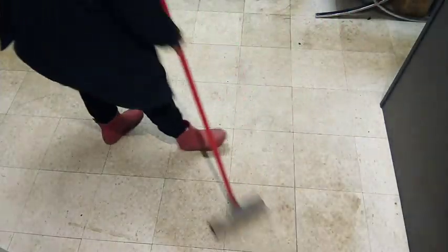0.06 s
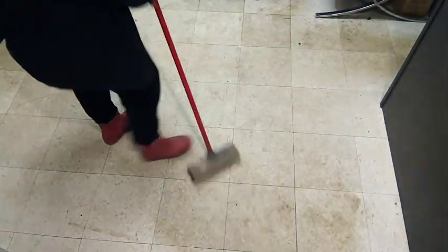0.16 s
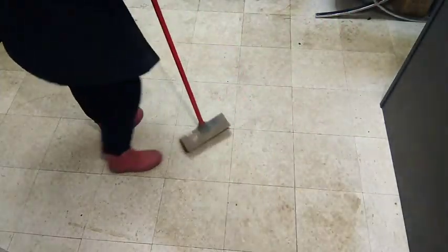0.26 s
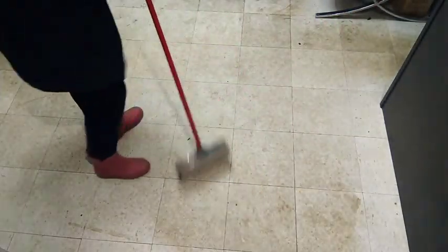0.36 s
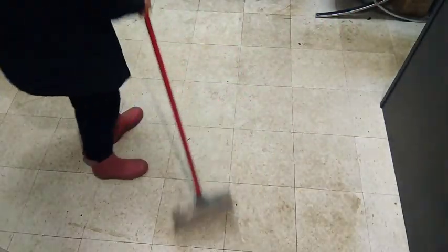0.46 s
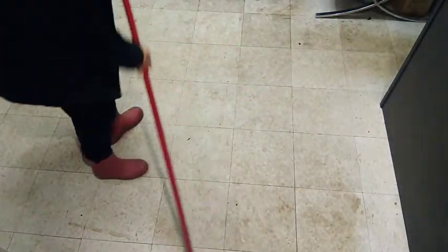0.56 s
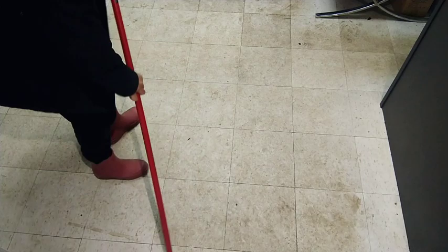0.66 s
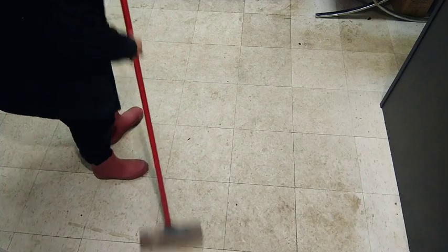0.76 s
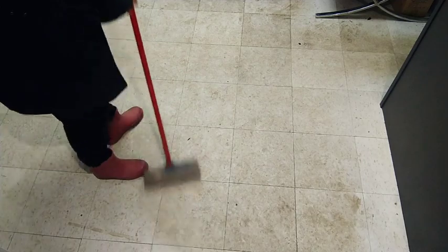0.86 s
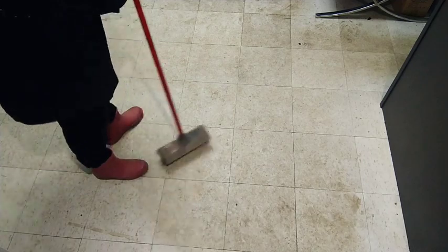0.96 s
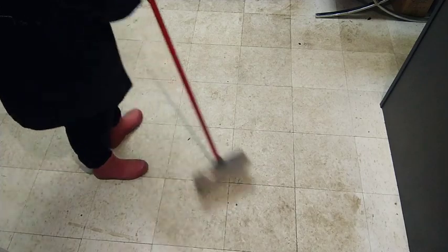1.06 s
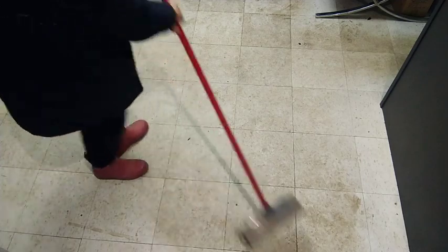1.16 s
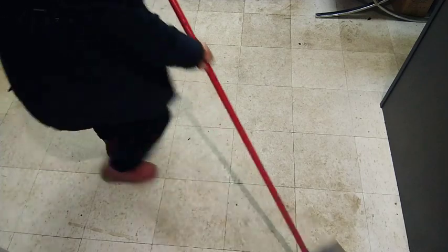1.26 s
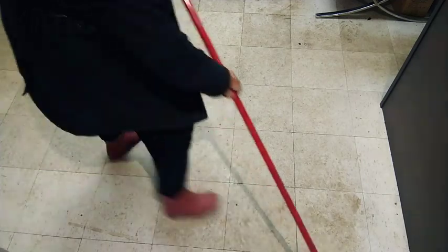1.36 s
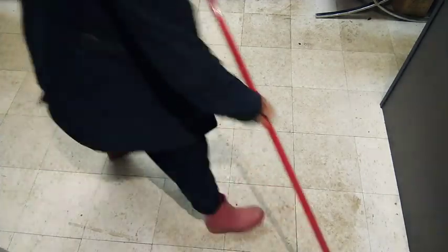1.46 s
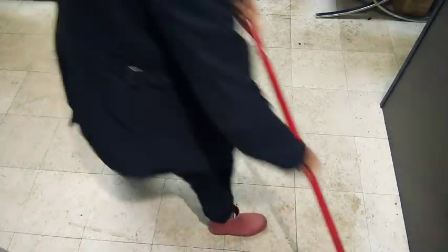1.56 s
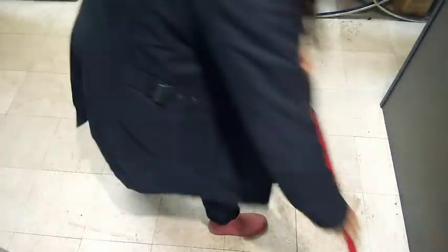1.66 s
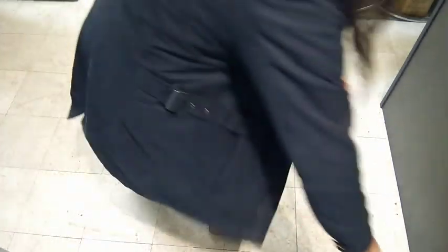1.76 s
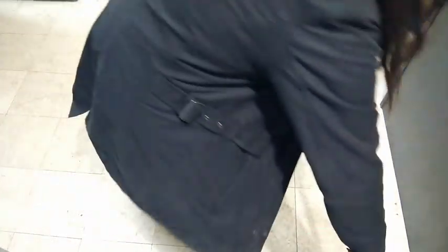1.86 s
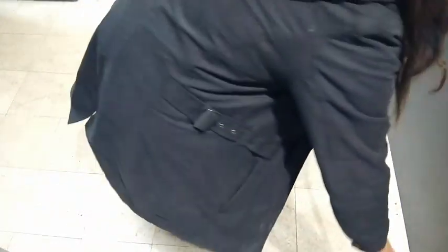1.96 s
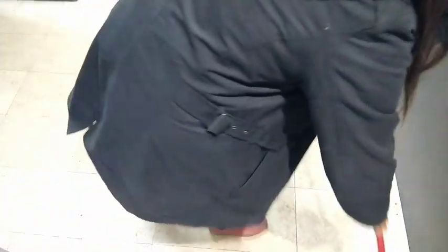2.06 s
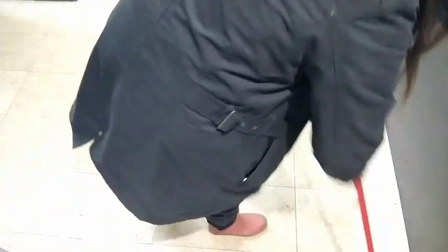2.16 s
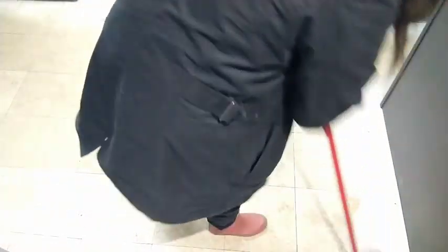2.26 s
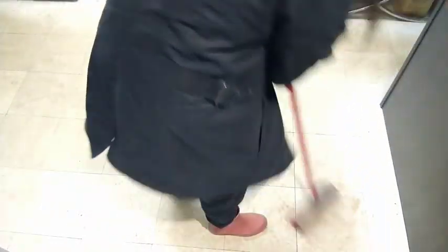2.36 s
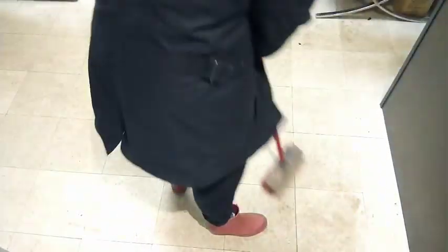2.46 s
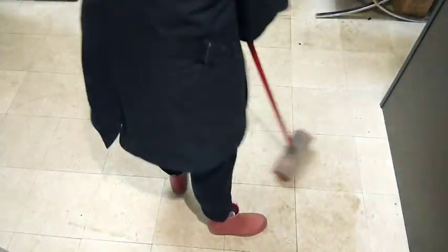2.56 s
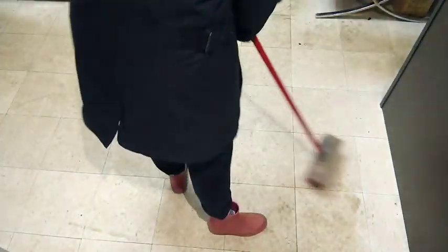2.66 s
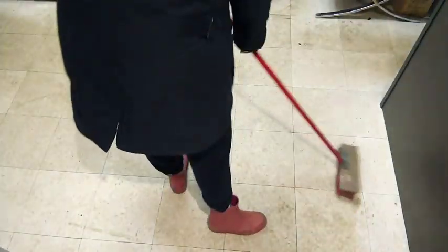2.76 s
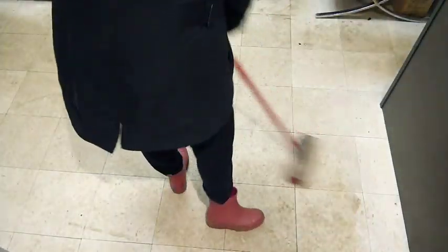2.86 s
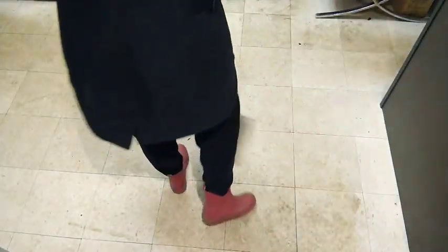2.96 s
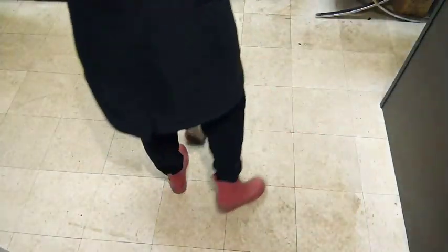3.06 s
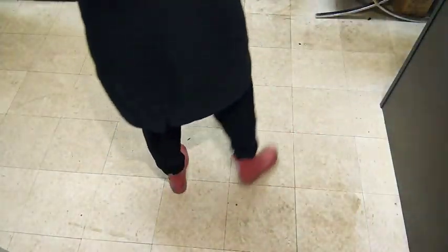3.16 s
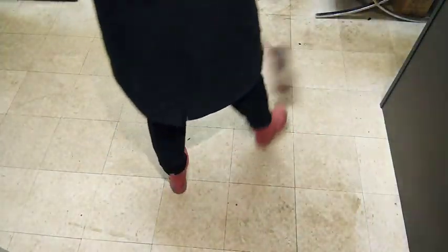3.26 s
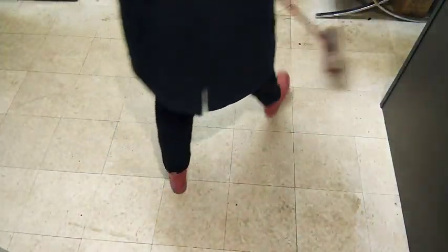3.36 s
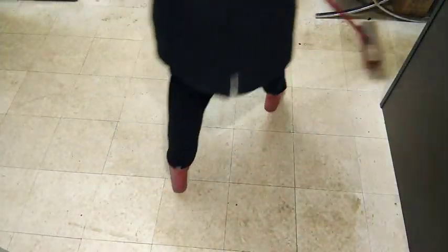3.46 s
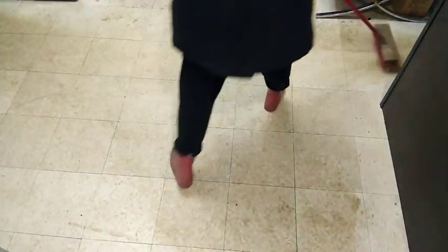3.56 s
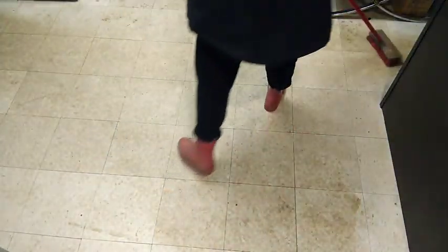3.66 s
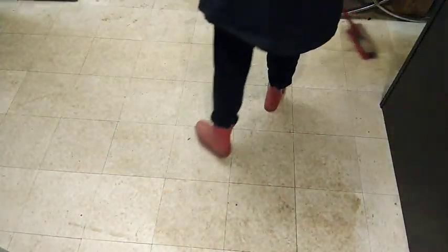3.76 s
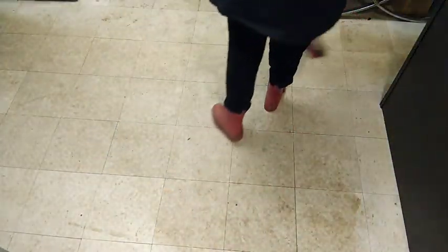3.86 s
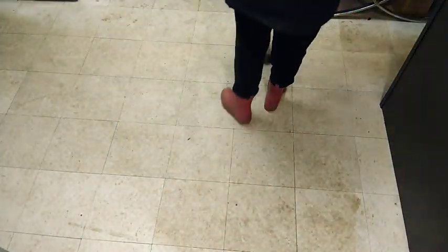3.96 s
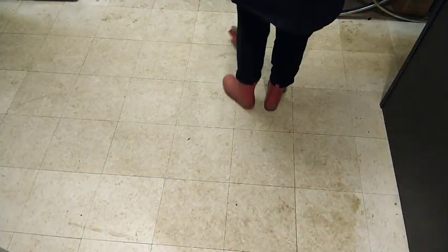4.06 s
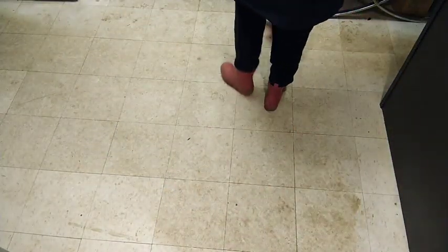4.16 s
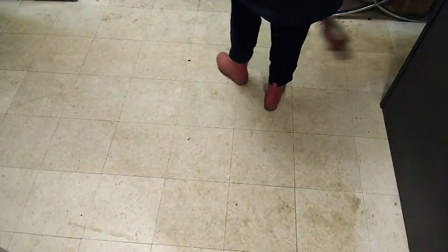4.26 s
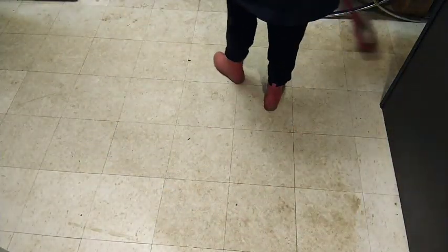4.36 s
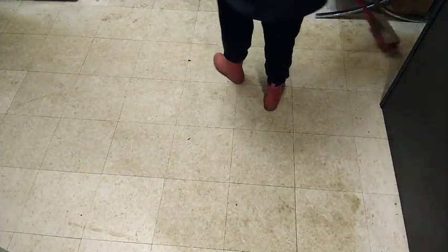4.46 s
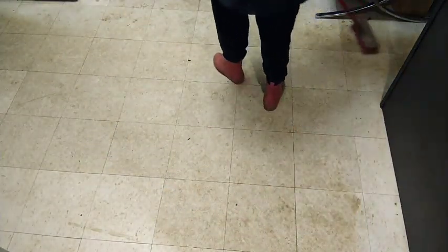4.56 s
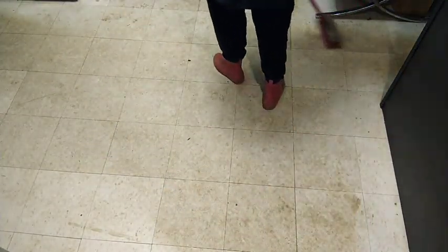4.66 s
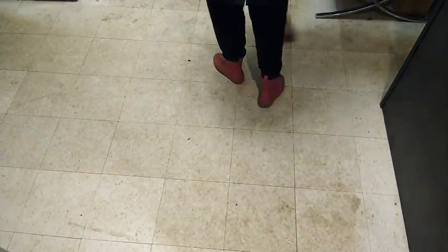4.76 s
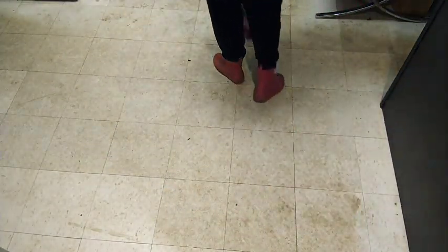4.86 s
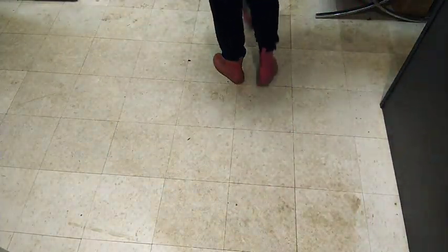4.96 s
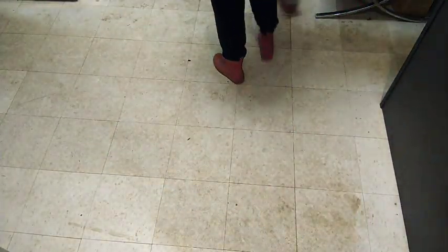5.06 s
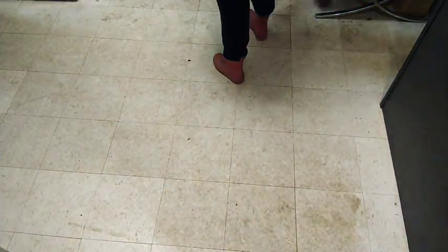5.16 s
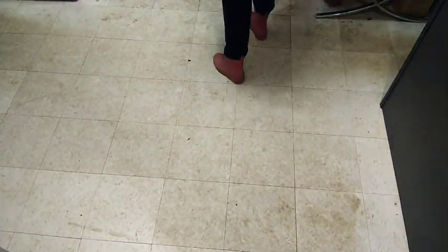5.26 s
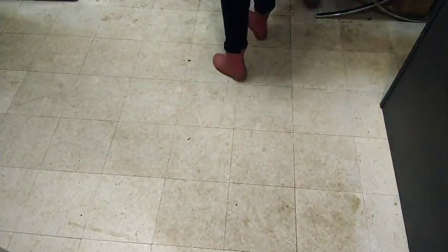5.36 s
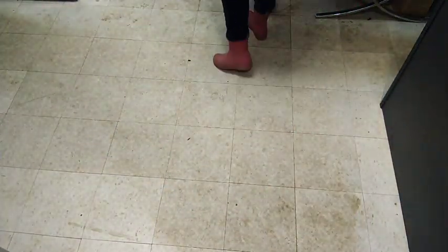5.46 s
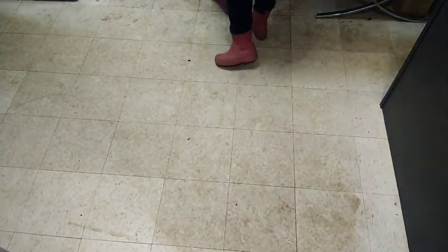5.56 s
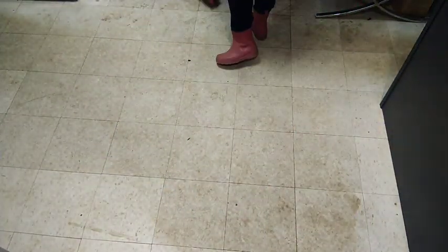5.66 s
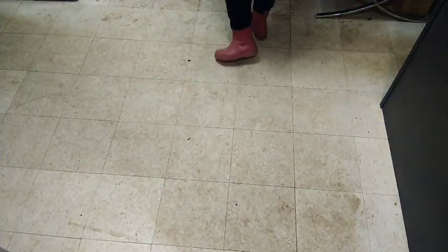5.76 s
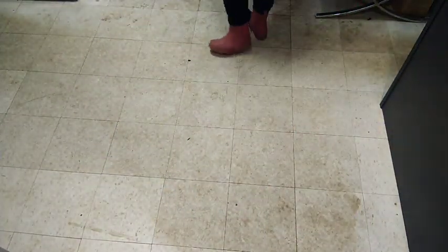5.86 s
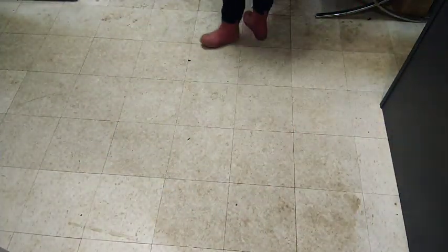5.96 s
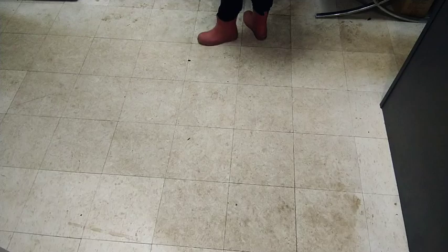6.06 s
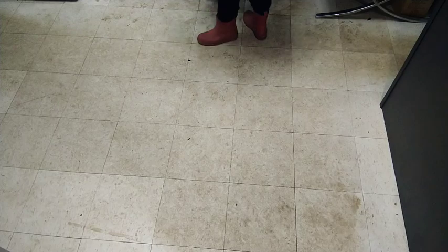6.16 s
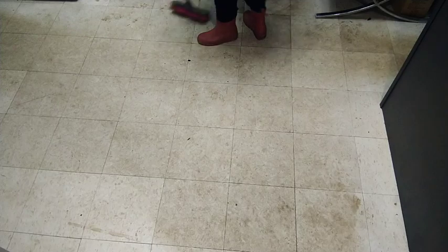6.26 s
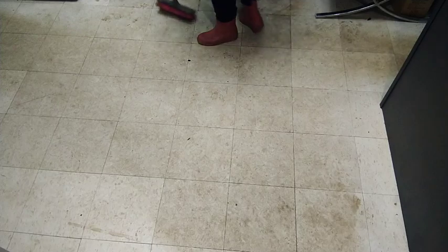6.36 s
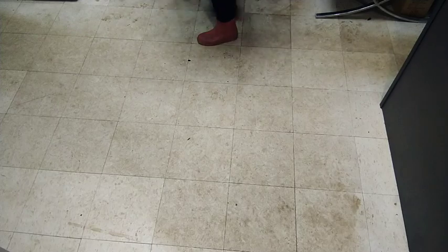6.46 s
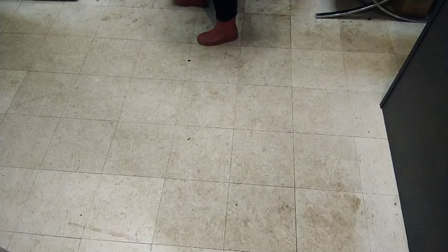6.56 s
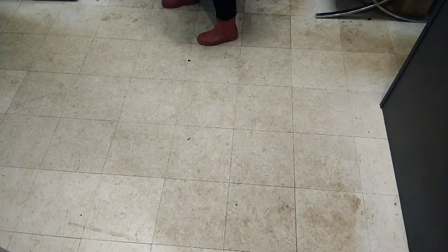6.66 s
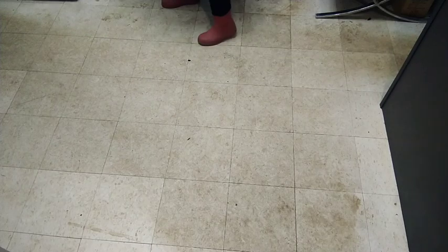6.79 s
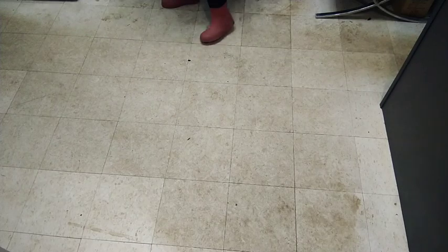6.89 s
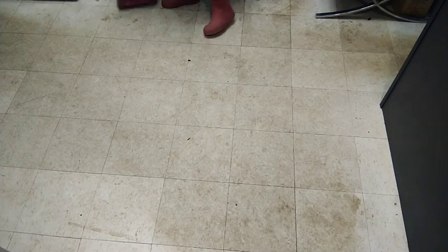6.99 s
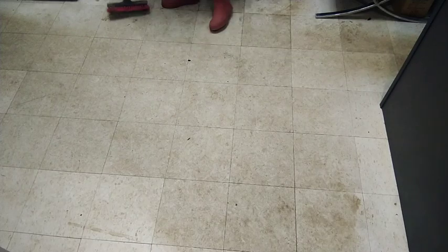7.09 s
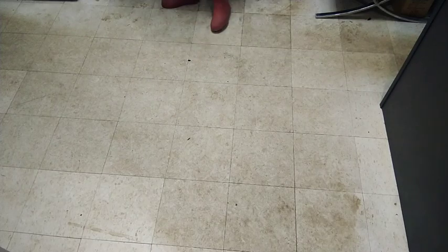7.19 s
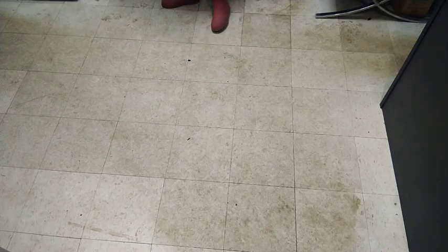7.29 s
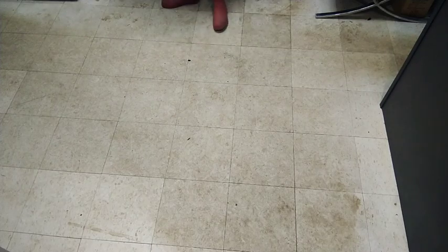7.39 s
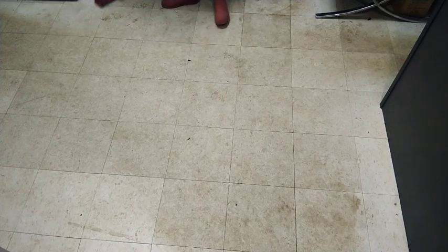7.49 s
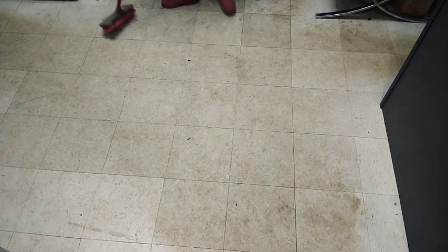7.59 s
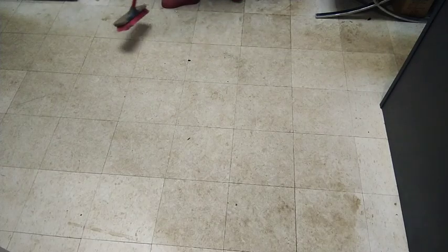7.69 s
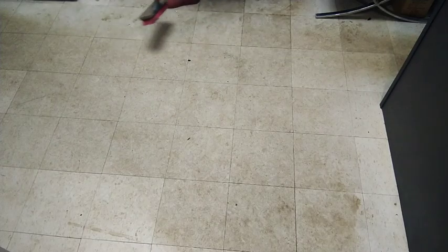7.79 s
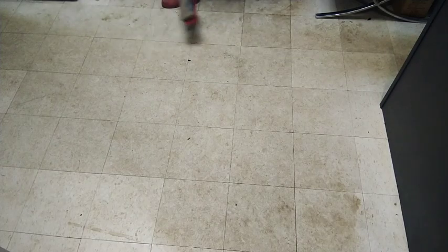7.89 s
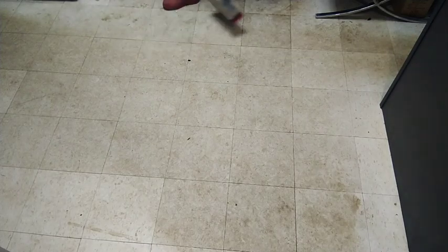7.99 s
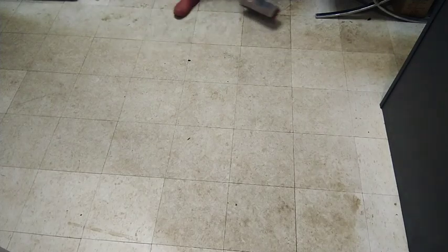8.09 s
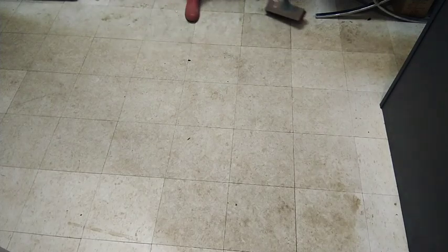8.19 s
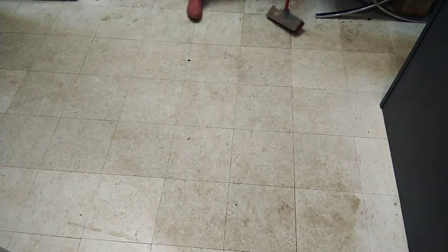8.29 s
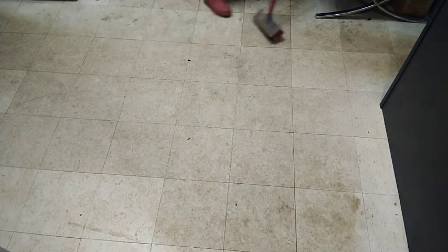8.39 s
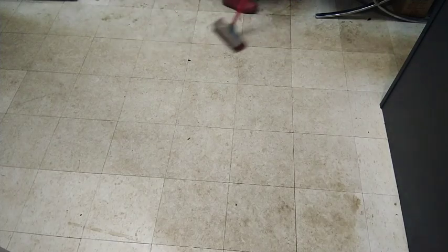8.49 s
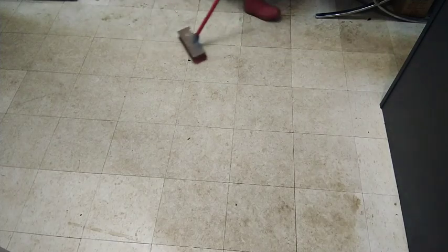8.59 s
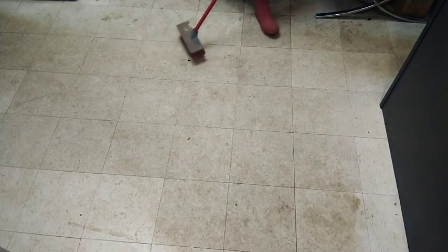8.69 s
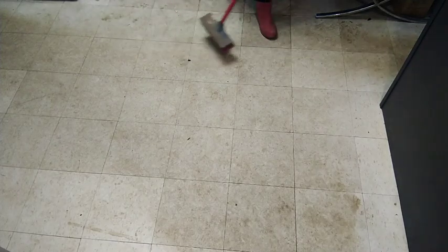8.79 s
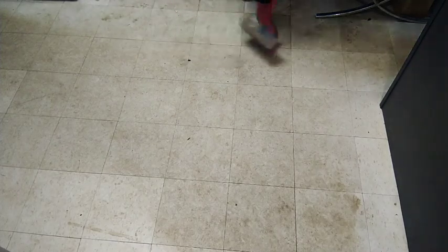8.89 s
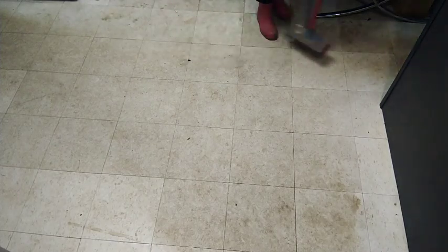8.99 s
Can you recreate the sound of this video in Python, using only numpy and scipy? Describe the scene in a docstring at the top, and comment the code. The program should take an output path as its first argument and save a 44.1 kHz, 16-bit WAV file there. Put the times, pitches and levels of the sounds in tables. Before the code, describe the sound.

A small hard room carries faint ventilation noise, a weak hum and occasional low rumble. At 0 s a stiff broom is already sweeping tiles: a strong, bright, hissing rasp, then a head click at 0.2 and bristle flicks near 0.5. Another stroke comes at 0.7; a step and scuff at 1.2, coat rustle, and a step at 1.6. Sharp head clacks at 1.95 lead to by far the loudest event at 2.1: a close cupboard door thumps shut, bouncing four times within a tenth of a second, its panel ringing low and rattling briefly, over a forceful stroke. Strokes follow at 2.9, 3.7, 4.6, a short dab at 5.2, then 5.4, 6.1, 6.9 and 7.5, with clicks, fine bristle ticks, soft footfalls at 4.4, 5.2 and 6.7, and small rubber squeaks. Light sole taps and scuffs surround a last very weak stroke at 8.4.

```python
"""From the first moment a stiff broom sweeps a tiled floor, in a small room with a humming appliance.
Through a dozen strokes bristles slip as dense grains of noise, then flick free; the head clicks on its handle.
Rubber soles scuff, step and tap now and then throughout, as bursts of coloured noise; a coat rustles.
About two seconds in, a cupboard door is pushed shut close by: it bounces, and decaying panel modes ring.
A phone hears it all to the last, weak stroke, its right port ringing in the treble."""
import sys
import numpy as np
from scipy import signal
from scipy.fft import rfft, irfft, next_fast_len
from scipy.io import wavfile

SR = 44100
rng = np.random.default_rng(int(sys.argv[2]) if len(sys.argv) > 2 else 0)


def dump_mix(stems):
    """Bounce the given channels to the path in sys.argv[1] as a 16-bit WAV at rate SR."""
    frames = np.atleast_2d(stems).T  # one column per channel
    limited = np.clip(frames, -1, 1)  # hard clip at full scale
    pcm = np.round(limited * 32767).astype(np.int16)
    wavfile.write(sys.argv[1], SR, pcm)


N = 398223
T = np.arange(N) / SR  # t/s

# Ventilation noise, spectral shape: f/Hz, level/dB per Hz
AIR_SPECTRUM = [(20, -3.5), (45, -16), (80, -5.5), (130, -2.5), (220, -6.5), (320, -18), (450, -10.5),
                (650, -19.5), (1300, -19.5), (3000, -27), (7000, -31.5), (16000, -49)]
# Appliance hum, partials: f/Hz, level/dB
HUM_PARTIALS = [(81, -74), (209, -76.5), (427, -68.5)]
# Spells of low rumble: start t/s, end t/s, f/Hz, level/dB
RUMBLE_SPELLS = [(2.4, 3.154, 96, -62), (2.997, 6.8, 130, -65.5), (7.05, 9.1, 81.8, -66.5)]
# Spells of movement that rustle the coat: start t/s, end t/s, level/dB
COAT_MOVES = [(0, 1.3, -67.5), (1.455, 2.805, -66.5), (3.547, 7.7, -69), (4.25, 4.51, -75.5),
              (8.106, 8.862, -66.5)]
# Coat cloth, spectral shape: f/Hz, level/dB per Hz
CLOTH_SPECTRUM = [(300, 1), (4000, -0.5), (7000, -5.5), (16000, -15.5)]
# Door striking its frame and bouncing: t/s, level/dB
DOOR_BLOWS = [(2.098, -8), (2.121, -12), (2.1463, -14.5), (2.172, -19.5)]
# Modes of the door panel: f/Hz, relative level/dB, T60/s
DOOR_MODES = [(51, -19, 0.45), (81.3, -13, 0.48), (118.1, -1, 0.386), (135.7, 4, 0.27), (173.8, 0.5, 0.42),
              (215.4, 3, 0.38), (241, 1, 0.27), (266.7, -1, 0.35), (309.6, -2, 0.33), (375, -4, 0.32),
              (396, -2, 0.24), (423, -7.5, 0.51), (462, -6, 0.33), (489.6, -5.5, 0.47), (550, -13, 0.51),
              (593, -17, 0.29), (622, -13, 0.21), (734, -11.5, 0.43), (802, -12, 0.4), (885, -15, 0.25),
              (1330, -19.5, 0.39)]
# Rattle of the door, spectral shape: f/Hz, level/dB per Hz
RATTLE_SPECTRUM = [(60, -17), (220, -7.5), (450, 1), (850, -7), (1200, -24.5), (2300, -17), (3200, -26.5),
                   (16000, -81)]
# Footfalls: t/s, level/dB
FOOTFALLS = [(1.208, -51.5), (1.634, -50.5), (4.429, -56.5), (5.213, -53.5), (5.377, -54), (6.704, -48)]
# Hollow taps of the soles: t/s, level/dB
SOLE_TAPS = [(1.635, -61), (5.282, -57), (7.825, -62), (8.535, -62)]
# Soles dragging: t/s, length/s, level/dB, tail relative level/dB,
# squeak f/Hz, squeak relative level/dB, squeak width/share of its f
SOLE_SCUFFS = [(0.164, 0.062, -54, -13, 712, -8, 0.48), (1.209, 0.066, -53, -4, 653, -22, 0.25),
               (5.194, 0.13, -71, -19, 3050, 9.5, 0.082), (6.685, 0.074, -59.5, -8, 2630, -8, 0.14),
               (8.253, 0.04, -65, -13, 2590, -2, 0.22), (8.717, 0.045, -60, -17, 2210, -13, .12)]
# Thud of a footfall, spectral shape: f/Hz, level/dB per Hz
FOOT_SPECTRUM = [(40, -24), (110, 7), (200, 0), (450, -6), (1500, -18), (5000, -51)]
# Dragging sole, spectral shape: f/Hz, level/dB per Hz
SOLE_SPECTRUM = [(300, -6), (800, 1.5), (1400, -7.5), (2400, 1), (4500, 1.5), (7500, -2.5), (16000, -17)]
# Head clicking on handle and floor: t/s, crack level/dB, hollow ring level/dB, ping f/Hz, ping level/dB
HEAD_CLACKS = [(0.218, -46, -45.5, 2010, -54), (0.711, -58, -50.5, 1360, -55),
               (1.208, -45.5, -75, 2150, -61), (1.954, -46.5, -52, 1380, -53), (1.961, -39, -44, 6160, -57),
               (2.870, -40, -68, 2480, -51), (3.748, -53, -52, 2290, -54), (4.621, -44, -54, 5200, -54),
               (5.362, -63, -68, 5430, -51), (5.377, -61, -56, 3570, -51), (6.075, -49, -59, 5340, -64)]
# Sharp crack, spectral shape: f/Hz, level/dB per Hz
CRACK_SPECTRUM = [(200, 7), (1000, -7), (2500, 0.5), (5200, 4), (8000, -4), (16000, -24)]
# Bristles flicking free between strokes: t/s, level/dB, rise/s, twang f/Hz
BRISTLE_FLICKS = [(0.402, -57.5, 0.0024, 7000), (0.472, -55, 0.013, 7650), (0.58, -55, 0.0083, 6600),
                  (1.421, -54, 0.0026, 7060), (1.726, -61, 0.0022, 6500), (3.286, -59, .0005, 14100),
                  (4.348, -57.5, 0.006, 6630), (5.192, -51.5, 0.0037, 6400), (5.868, -53, .005, 9540),
                  (6.534, -57.5, 0.00067, 9000), (7.348, -54, 0.0011, 13800)]
# Tick of freed bristles, spectral shape: f/Hz, level/dB per Hz
FLICK_SPECTRUM = [(1500, -15), (4500, -6), (8000, -3.5), (9300, 2), (11500, -3.5), (14000, -4),
                  (16000, -25)]
# Broom strokes: t/s, length/s, force/dB, brightness/dB, share of length spent speeding up,
# landing grit level/dB, head ring f/Hz, head ring level/dB, head ring T60/s
BROOM_STROKES = [ (0.0, 0.34, 4.5, 1.9, 0.69, -56.5, 1364, -47, 0.16),
                 (0.727, 0.3, 1.6, 0.7, 0.81, -57, 1137, -56, 1.9),
                 (2.109, 0.47, 5.5, 1.5, 0.74, -44, 1373, -54, 1),
                 (2.873, 0.26, 2.5, 0.7, 0.53, -51.5, 1210, -74, 1.2),
                 (3.747, 0.38, -2.5, 0, 0.75, -61, 1116, -59, 0.89),
                 (4.624, 0.33, 0, 0, 0.69, -57, 1210, -63, 0.81),
                 (5.197, 0.094, 0.5, -7, 0.6, -62, 1150, -82, 1),
                 (5.362, 0.33, 0, -2.5, 0.56, -55, 1130, -65, 1.2),
                 (6.078, 0.32, -1, -0.9, 0.68, -57.5, 1170, -77, 1.3),
                 (6.856, 0.28, -2.5, 0.1, 0.64, -56, 1150, -65, 0.98),
                 (7.455, 0.2, -6.5, 1, 0.62, -57.5, 998, -72, 0.72),
                 (8.405, 0.31, -14.5, 2, 0.66, -66.5, 1430, -88, 1)]
# Hiss of the sliding tips, spectral shape: f/Hz, level/dB per Hz
HISS_SPECTRUM = [(1500, -29), (5200, -10.5), (6400, 2), (7500, 3), (9000, -2.5), (11000, -8), (15500, -25)]
# Finer fizz of the tips, spectral shape: f/Hz, level/dB per Hz
FIZZ_SPECTRUM = [(5000, -16), (8500, 0), (10500, 3.5), (12500, 3), (14500, 0.5), (16000, -5)]
# Scrape of the bristle shafts, spectral shape: f/Hz, level/dB per Hz
SCRAPE_SPECTRUM = [(400, -13.5), (850, -15), (1100, -4), (1850, -3), (2200, 2), (2650, 4), (4200, 3),
                   (6000, 0.5), (12000, -23)]
# Grit under the landing head, spectral shape: f/Hz, level/dB per Hz
HEAD_SPECTRUM = [(400, -13), (800, -5), (1100, 6), (1550, 4.5), (2300, -1.5), (3500, -4), (5500, -12),
                 (8000, -8.5), (14000, -16)]
# Extra gain of the right port: f/Hz, level/dB
RIGHT_PORT_GAIN = [(150, 1.5), (2500, -0.5), (4400, 2), (5500, 4.5), (6300, 8.5), (7100, 8.5), (8200, 4.5),
                   (10500, 0.5)]

RUMBLE_EASE_S, MOVE_EASE_S = 0.052, 0.12
COAT_WAVER_DB = 2.5
TAP_HZ, TAP_T60_S = 570, 0.21
SQUEAK_BEND, SQUEAK_SETTLE_S, SOLE_CHATTER_DB = 0.162, 0.0219, 2  # bend is a share of the pitch
HOLLOW_HZ, HOLLOW_T60_S = 1200, 0.068  # the ring of the hollow head
PING_T60_S = 0.082
FLICK_T60_S, TWANG_DB, TWANG_T60_S = 0.19, -9, 0.16
HISS_DB, FIZZ_DB, SCRAPE_DB = -44.5, -46, -53.5  # a stroke of ordinary force
# dB per dB: a bright stroke rides on the tips and scrapes less
SCRAPE_PER_FORCE, SCRAPE_PER_BRIGHTNESS = 0.51, -1.25
BEND_S = .13  # strokes much shorter than this barely load the head
HANDLE_HZ, HANDLE_DB = 2150, -13  # level relative to the scrape
# loose outer bristles skim the tiles at any force, most in a short dab
SKIM_HZ, SKIM_DB, DAB_DB = 4430, -63.5, 5
TOP_HZ = 15700


def undb(db):
    """Level in decibels becomes an amplitude ratio."""
    return 10 ** (np.asarray(db) / 20)


def unit(x):
    """Normalization to an rms of 1."""
    return x / np.sqrt(np.mean(x ** 2))


def add(out, x, s):
    """Superposition: x is summed into out from time s."""
    i = max(int(s * SR), 0)
    out[..., i:i + x.shape[-1]] += x[..., :N - i]


def colour(x, spectrum):
    """Linear filtering: the gain is interpolated between (f/Hz, level/dB) points on a log frequency axis."""
    hz, db = np.transpose(spectrum)
    size = next_fast_len(x.shape[-1])
    f = np.maximum(np.fft.rfftfreq(size, 1 / SR), 1)
    gain = undb(np.interp(np.log(f), np.log(hz), db))
    return irfft(rfft(x, size) * gain, size)[..., :x.shape[-1]]


def resonance(hz, width=.12):
    """Resonance: a spectrum of one peak, 13 dB down at a share `width` of its frequency to either side."""
    return [(hz / 3, -45), (hz / (1 + width), -13), (hz, 0), (hz * (1 + width), -13), (hz * 3, -45)]


def diffuse(size, apart_hz=480):
    """Diffuse field: noise from all sides, on which the two ports agree only in the bass."""
    mid, side = rfft(rng.standard_normal((2, size)))
    alike = np.exp(-(np.fft.rfftfreq(size, 1 / SR) / apart_hz) ** 3)
    common = mid * np.sqrt(1 + alike)
    opposed = np.array([[1], [-1]]) * side * np.sqrt(1 - alike)
    return unit(irfft(common + opposed, size))


def burst(spectrum, envelope):
    """Amplitude modulation: coloured diffuse noise under an envelope."""
    return unit(colour(diffuse(len(envelope)), spectrum)) * envelope


def fade(t60):
    """Damping: one second of exponential decay, falling 60 dB in t60."""
    return undb(-60 * T[:SR] / t60)


def swell(rise_s):
    """Exponential build-up: one second of a rounded onset."""
    return 1 - np.exp(-T[:SR] / rise_s)


def spell(start, end, ease_s):
    """Smooth gating: an envelope that eases in, holds and eases out."""
    return (np.tanh((T - start) / ease_s) - np.tanh((T - end) / ease_s)) / 2


def wander(count):
    """Slow chance: random values spread over the whole scene and joined by lines."""
    return np.interp(T, np.linspace(0, T[-1], num=count), rng.standard_normal(count))


def judder(depth_db):
    """Irregular friction or contact: one second of gain that varies unevenly, mostly below 100 Hz."""
    slow_noise = colour(rng.standard_normal(SR), [(5, 12.5), (25, 8.0), (120, -40), (800, -68)])
    return undb(depth_db * unit(slow_noise))


def grains(per_s, spread_db, size, direct=0.25):
    """Stick-slip: countless bristle slips; scattering makes each one differ at the two ports."""
    happens = rng.random(size) < per_s / SR
    slips = happens * undb(spread_db * np.minimum(rng.exponential(size=size), 4))
    shared, left, right = rng.standard_normal((3, size))
    return slips * (direct * shared + np.array([left, right]))


def squeal(hz, width, bend, settle_s):
    """Narrow-band resonance: `width` is a share of hz; with a bend the pitch starts sharp and sinks to hz."""
    half = hz * width / 2
    lowpass = [(half / 2, 0), (half, -3), (half * 2, -11), (half * 10, -50)]
    cos_part, sin_part = colour(rng.standard_normal((2, 2, SR)), lowpass)
    pitch = hz * (1 + bend * np.exp(-T[:SR] / settle_s))
    phase = 2 * np.pi * np.cumsum(pitch) / SR
    return unit(cos_part * np.cos(phase) + sin_part * np.sin(phase))


def room(x, wet_db, t60):
    """Reverberation: the tail of a small hard room, where air and furniture soak up the top."""
    tail = colour(diffuse(SR), [(100, 8.0), (7500, 4.5), (9500, 2.5), (15000, -2.0)])
    tail = tail * fade(t60) * swell(0.0073)
    tail /= np.sqrt(np.sum(tail ** 2) / 2)
    return x + undb(wet_db) * signal.oaconvolve(x, tail, axes=1)[:, :N]


def background():
    """Steady sources: broadband ventilation noise, slightly wavering hum tones, a rumble that comes and goes."""
    out = undb(-62.5) * burst(AIR_SPECTRUM, np.ones(N))
    for hz, db in HUM_PARTIALS:
        waver = wander(count=60)  # moves level and pitch together
        phase = 2 * np.pi * np.cumsum(hz * (1 + 0.00295 * waver)) / SR
        out += undb(db + 1.4 * waver) * np.sqrt(2) * np.sin(phase)
    for start, end, hz, db in RUMBLE_SPELLS:
        out += burst(resonance(hz, width=0.13), undb(db) * spell(start, end, RUMBLE_EASE_S))
    return out


def coat():
    """Cloth friction: the coat rustles unevenly while its wearer moves and is quiet in the pauses."""
    moving = sum(undb(db) * spell(start, end, MOVE_EASE_S) for start, end, db in COAT_MOVES)
    return burst(CLOTH_SPECTRUM, moving * undb(COAT_WAVER_DB * wander(count=70)))


def door(ring_db=-16.5, rattle_db=-17.0, crack_db=-27, clatter_db=-22, thud_hz=205, lag_s=0.00011, apart_hz=420):
    """Impact and modal decay: each blow thuds and clatters; from the first, panel modes build up and die.

    The sound reaches the right port later by lag_s in the thuds and modes."""
    out = np.zeros((2, N))
    t = np.maximum(T[:SR] - np.array([[0], [lag_s]]), 0)
    clatter_spectrum = [(500, 6.0), (1100, -2.0), (1450, 5), (2400, -3.5), (3200, -13.0), (8000, -30.0)]
    for s, db in DOOR_BLOWS:
        thud = -np.sin(2 * np.pi * thud_hz * t) * fade(0.089)
        clatter_envelope = undb(clatter_db) * swell(0.0028) * fade(0.48) * judder(depth_db=3.5)
        add(out, undb(db) * (thud + burst(clatter_spectrum, clatter_envelope)), s)
    first_s, first_db = DOOR_BLOWS[0]
    ring = 0
    for hz, db, t60 in DOOR_MODES:
        # the higher a mode, the more the walls turn its phase between the ports
        turn = np.array([[.5], [-.5]]) * min((hz / apart_hz) ** 4, .7)
        # every mode is pushed the same way as the thud
        ring = ring - undb(db - 60 * t / t60) * np.sin(2 * np.pi * hz * t + turn)
    rattle = burst(RATTLE_SPECTRUM, undb(rattle_db) * fade(0.53) * judder(depth_db=1.0))
    # ring and rattle fade out sooner after about 0.2 s
    cutoff = np.exp(-(T[:SR] / 0.22) ** 4)
    add(out, (undb(ring_db) * ring + rattle) * swell(0.0081) * cutoff, first_s)
    add(out, burst(CRACK_SPECTRUM, undb(first_db + crack_db) * fade(0.091)), first_s)
    return out


def shoes():
    """Soft impact and rubber friction: soles thud, tap hollowly, and drag unevenly with a falling squeak."""
    out = np.zeros((2, N))
    for s, db in FOOTFALLS:
        add(out, undb(db) * burst(FOOT_SPECTRUM, swell(0.0014) * fade(0.15)), s)
    for s, db in SOLE_TAPS:
        add(out, undb(db) * burst(resonance(TAP_HZ, width=.25), swell(0.002) * fade(TAP_T60_S)), s)
    for s, length, db, tail_db, hz, squeak_db, width in SOLE_SCUFFS:
        contact = np.exp(-(T[:SR] / length) ** 4) + undb(tail_db) * fade(0.32)
        drag = swell(0.0057) * judder(SOLE_CHATTER_DB) * contact
        squeak = undb(squeak_db) * squeal(hz, width, SQUEAK_BEND, SQUEAK_SETTLE_S)
        add(out, undb(db) * (burst(SOLE_SPECTRUM, drag) + squeak * drag), s)
    return out


def head_clicks():
    """Impact excitation: each knock of the head is a sharp crack, a hollow ring and a decaying ping."""
    out = np.zeros((2, N))
    for s, db, hollow_db, ping_hz, ping_db in HEAD_CLACKS:
        crack = burst(CRACK_SPECTRUM, swell(0.00047) * (fade(0.042) + undb(-24.0) * fade(1.0)))
        hollow = burst(resonance(HOLLOW_HZ, width=1.0), fade(HOLLOW_T60_S))
        # the pitch of the ping depends on which edge of the head is struck
        ping = squeal(ping_hz, width=.1, bend=0, settle_s=1) * fade(PING_T60_S)
        add(out, undb(db) * crack + undb(hollow_db) * hollow + undb(ping_db) * ping, s)
    return out


def bristle_flicks():
    """Elastic release: bristles spring back with fine ticks and twangs, alone or in small tufts."""
    out = np.zeros((2, N))
    for s, db, rise_s, hz in BRISTLE_FLICKS:
        # a larger tuft lets go more slowly and rustles for longer
        rustle_t60 = FLICK_T60_S * (rise_s / 0.0053) ** 0.2
        tick = burst(FLICK_SPECTRUM, undb(-3) * fade(0.04) + undb(-1) * fade(rustle_t60))
        # a freed bristle twangs briefly at a pitch of its own
        twang = squeal(hz, width=.018, bend=0, settle_s=1) * fade(TWANG_T60_S)
        add(out, undb(db) * swell(rise_s) * (tick + undb(TWANG_DB) * twang), s)
    return out


def speed_db(t, gather_s, slow_s, start_db=-24, lift_db=-10, ease=1.73, release_s=0.02):
    """Friction noise grows with speed: the head gathers speed, slows a little, then the bristles leave the floor."""
    rising = start_db * np.clip(1 - t / gather_s, 0, 1) ** ease
    slowing = lift_db * np.clip((t - gather_s) / slow_s, 0, 1) ** 3.4
    leaving = -10 * np.maximum(t - gather_s - slow_s, 0) / release_s
    return rising + slowing + leaving


def slipping(per_s, spread_db, spectrum):
    """Stick-slip noise: one second of coloured bristle slips at an rms of 1."""
    return unit(colour(grains(per_s, spread_db, size=SR), spectrum))


def sweeping():
    """Friction and resonance: tips hiss with speed, shafts scrape lower; head and handle ring under the load."""
    out, t = np.zeros((2, N)), T[:SR]
    for lands, length, force_db, bright_db, gather_share, landing_db, ring_hz, ring_db, ring_t60 in BROOM_STROKES:
        gather_s = length * min(gather_share, .95)
        motion_db = speed_db(t, gather_s, length - gather_s)
        scrape_db = SCRAPE_DB + SCRAPE_PER_FORCE * force_db + SCRAPE_PER_BRIGHTNESS * bright_db
        hiss = undb(HISS_DB + force_db + motion_db) * slipping(14000, 0.5, HISS_SPECTRUM)
        fizz = undb(FIZZ_DB + force_db + bright_db + 1.13 * motion_db) * slipping(13000, -2.5, FIZZ_SPECTRUM)
        scrape = undb(scrape_db + 0.39 * motion_db) * slipping(5000, 0.0, SCRAPE_SPECTRUM)
        # the tips only start to slide once the bristles have bent over
        sliding = 1 - np.exp(-(t / (0.27 * gather_s)) ** 3)
        # grit and uneven tiles make the whole tuft chatter
        chatter = judder(depth_db=1.0)
        # tufts of unlike length give every stroke its own ragged colour
        ragged = np.transpose([np.geomspace(900, 6000, num=40), 2.4 * rng.standard_normal(40)])
        # a short dab barely bends the bristles
        bent = (1 - np.exp(-(length / BEND_S) ** 5)) * swell(0.0028)
        push = judder(depth_db=2.0) * np.exp(-(t / length) ** 8)
        stutter = undb(landing_db) * fade(1.14) * slipping(2500, -0.5, HEAD_SPECTRUM)
        # on landing the bending bristles ring the hollow head
        ring = undb(ring_db) * fade(ring_t60) * squeal(ring_hz, width=.12, bend=.12, settle_s=.045)
        # the handle sings along with the scrape
        handle_tone = squeal(HANDLE_HZ, width=.05, bend=0, settle_s=1)
        handle = undb(HANDLE_DB + scrape_db + 0.3 * motion_db) * handle_tone
        skim_db = SKIM_DB + DAB_DB * (length < BEND_S) + 0.53 * motion_db
        skim = burst(resonance(SKIM_HZ, width=0.94), undb(skim_db) * judder(depth_db=3.5))
        tips = chatter * sliding * (hiss + fizz + skim)
        shafts = colour(chatter * scrape + push * stutter, ragged)
        add(out, tips + bent * (shafts + push * ring + handle), lands)
    return out


def scene():
    """Superposition of sources: broom and shoes with the room's reverberation, the rest without."""
    knocks = head_clicks() + bristle_flicks() + shoes()
    reverberant = room(knocks, wet_db=-6.5, t60=0.47) + room(sweeping(), wet_db=-11.0, t60=0.21)
    return background() + coat() + door() + reverberant


def record(dry):
    """Reception: the right port resonates near 7 kHz; deep bass rolls off, peaks are rounded, the top is cut."""
    ports = np.array([dry[0], colour(dry[1], RIGHT_PORT_GAIN)])
    ports = signal.sosfilt(signal.butter(4, 46, "highpass", fs=SR, output="sos"), ports)
    rounded = np.tanh(1.7 * ports) / 1.7
    return signal.sosfilt(signal.ellip(10, .2, 80, TOP_HZ, fs=SR, output="sos"), rounded)


dry = scene()
out = record(dry)
dump_mix(out)
```